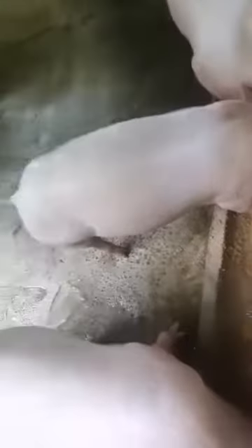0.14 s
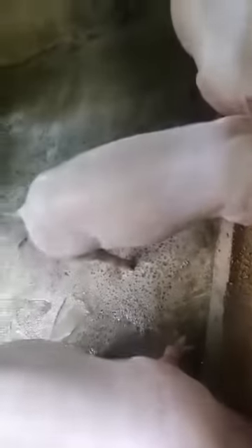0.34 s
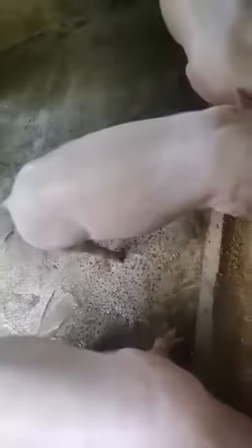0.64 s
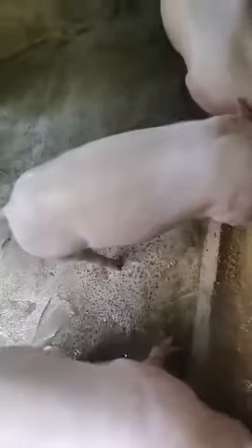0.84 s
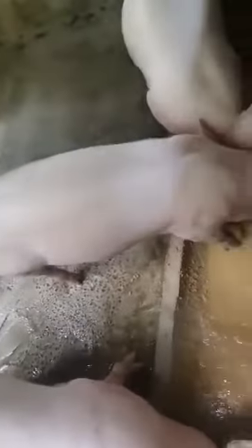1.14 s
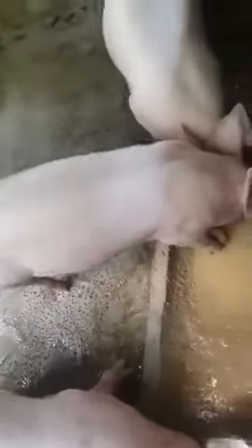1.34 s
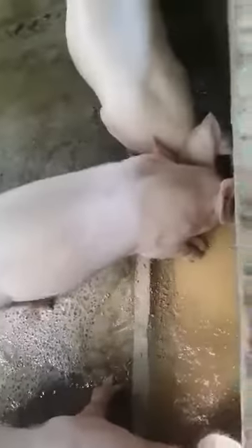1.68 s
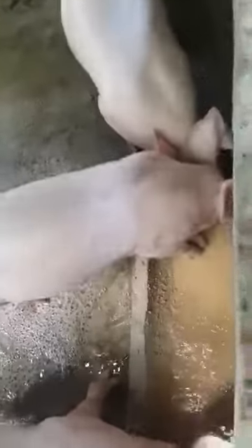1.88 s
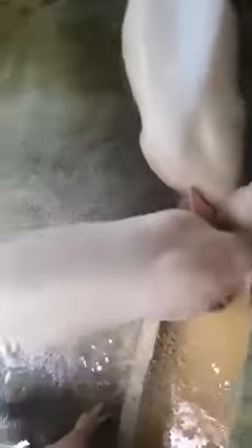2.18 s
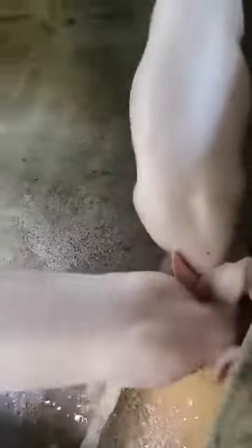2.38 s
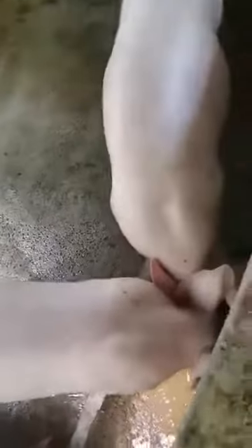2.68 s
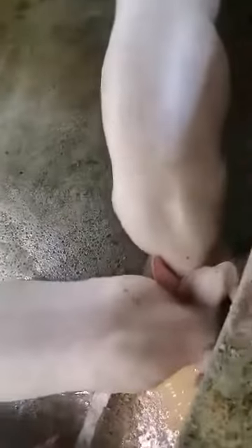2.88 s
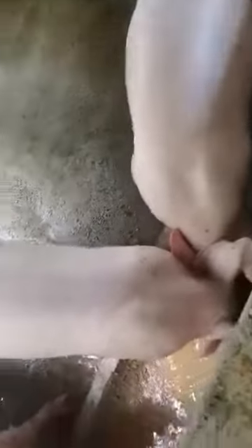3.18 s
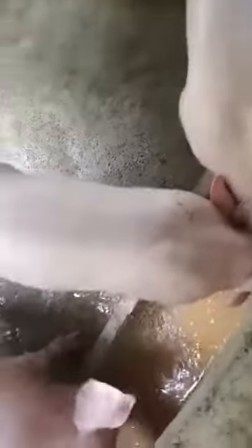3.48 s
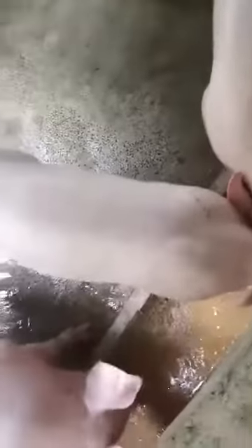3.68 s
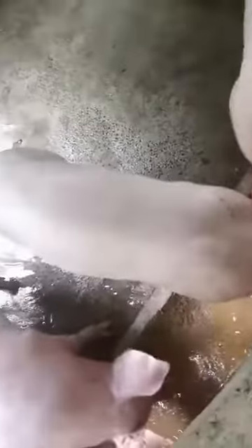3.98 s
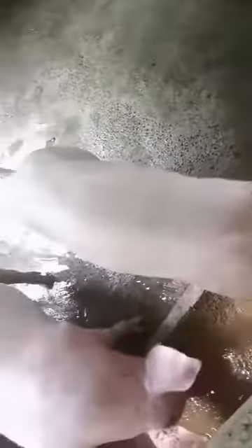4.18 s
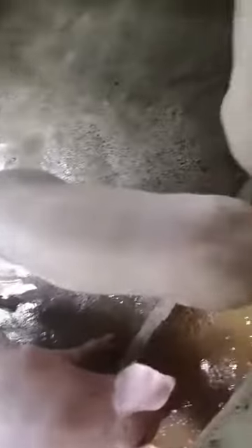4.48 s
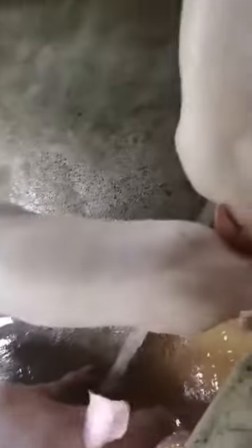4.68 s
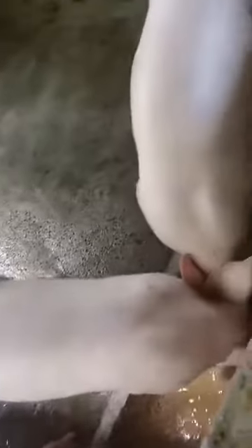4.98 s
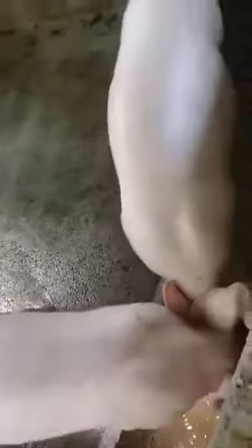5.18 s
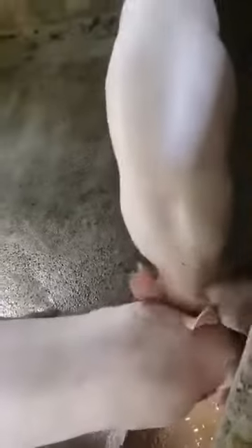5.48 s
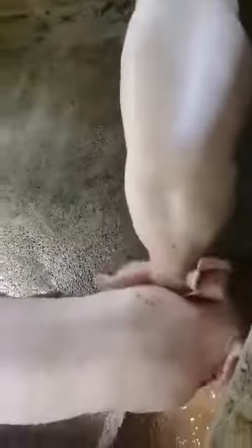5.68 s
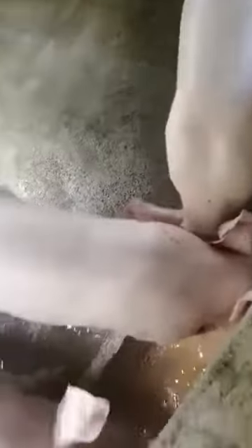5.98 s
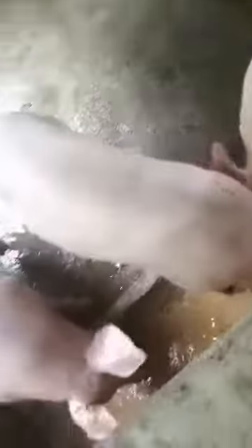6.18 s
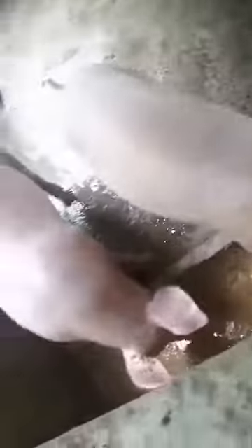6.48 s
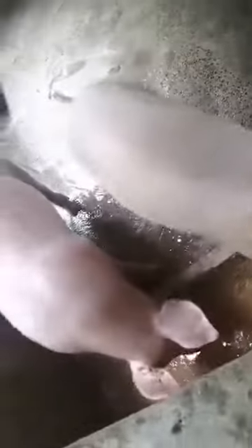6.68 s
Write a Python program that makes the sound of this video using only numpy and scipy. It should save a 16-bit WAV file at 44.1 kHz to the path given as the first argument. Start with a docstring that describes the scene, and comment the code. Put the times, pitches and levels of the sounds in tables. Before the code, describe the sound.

Young pigs eat wet feed from a concrete trough close to the microphone, with uneven jaw smacks, lip squelches, bubbling slurps and a few dull snout knocks. Small birds, probably chicks, give faint falling peeps throughout. Air briefly buffets the microphone about two and a half seconds in. The chewing then grows busier, joined by short low grunts, in a pen with a slight echo.

```python
"""First come a low grunt and the falling peeps of small birds, probably chicks, in a hard-walled pen.
Young pigs eat wet feed from a concrete trough: slop bubbles, snouts bump, jaws smack and lips squelch.
The eating sounds are tiny wet pops and ringing bubbles; a grunt is a train of pulses from the voice box.
About two seconds in, puffs of air buffet the left microphone. A faint farm background lies under it all."""
import sys
import numpy as np
from scipy import signal
from scipy.fft import rfft, irfft, next_fast_len
from scipy.io import wavfile
from scipy.ndimage import map_coordinates

SR = 44100
rng = np.random.default_rng(int(sys.argv[2]) if len(sys.argv) > 2 else 0)


def to_wav(sig):
    """Store sig (one row per channel, or 1-D mono) as 16-bit WAV at the path in sys.argv[1].

    Samples outside -1..1 are clipped; the rate is SR.
    """
    pcm = np.clip(np.atleast_2d(sig), -1, 1) * 32767
    pcm = np.round(pcm).astype(np.int16)
    wavfile.write(sys.argv[1], SR, pcm.T)  # frames by channels


N = 301644
TIME = np.arange(N) / SR

# A level_db compares rows of one table. A fade_s is the time a sound takes to drop by 60 dB.
# Bird whistles, which sag to a bend in pitch and then plunge:
# start_s, glide_s, bend_hz, sag_hz, plunge_hz, level_db, echo_db
BIRD_PEEPS = [(0.0, 0.039, 4223, 245, 560, -46, 1), (0.042, 0.1, 4160, 247, 487, -46, -11),
              (0.123, 0.13, 4056, 548, 1260, -38.5, 0.5), (0.257, 0.052, 4260, 203, 611, -46.5, 8),
              (0.4, 0.15, 4480, 360, 400, -49, -3), (0.574, 0.094, 4080, 458, 1325, -39, -4),
              (0.703, 0.091, 4500, 406, 1300, -46, 2), (0.951, 0.13, 3926, 682, 1004, -39, -5.5),
              (1.088, 0.14, 4694, 256, 700, -46.5, -2), (1.331, 0.09, 4143, 332, 1103, -44.5, 14),
              (1.538, 0.083, 4575, 394, 1504, -44.5, -7), (1.818, 0.089, 4156, 454.5, 153, -38.5, -2),
              (1.986, 0.14, 4540, 358, 926, -45.5, -2), (2.123, 0.091, 4600, 432, 1006, -41, 5.5),
              (2.478, 0.12, 4376, 650, 1353, -41, 9.5), (2.974, 0.12, 4510, 480, 1202, -40, 30),
              (3.356, 0.087, 4690, 424, 1250, -42.5, 13), (3.545, 0.07, 4390, 445, 1500, -46, 6),
              (3.744, 0.13, 4540, 900, 1136, -43, -6), (3.926, 0.094, 4590, 449, 1280, -45, 5),
              (4.144, 0.14, 4476, 303, 1446, -47, -3), (4.263, 0.14, 5010, 900, 1210, -42, -2),
              (4.533, .095, 4694, 306, 1753, -42.5, 1), (4.598, .085, 4110, 715, 600, -43.5, -1),
              (4.933, 0.068, 4434, 465, 1000, -41.5, 3.5), (5.021, 0.091, 4830, 600, 1020, -43.5, 4),
              (5.269, 0.084, 4510, 389, 1130, -46.5, -4), (5.429, 0.054, 4340, 393, 684, -45.5, -5),
              (5.628, 0.064, 4460, 436, 995, -52, -5), (5.764, 0.064, 4600, 388, 1310, -45, 15),
              (5.972, 0.077, 4760, 250, 970, -43, -11), (6.371, 0.17, 4325, 1087, 903, -40, -11),
              (6.526, 0.087, 4360, 391, 1082, -41.5, -2), (6.778, 0.086, 5400, 325, 1170, -44, -3)]
# Closed-mouth grunts: start_s, length_s, pulse_rate_hz, level_db, roughness (0 to 1), nose_hz
PIG_GRUNTS = [(0.0, 0.22, 117.3, -39.5, 0.86, 118), (3.563, 0.27, 118.8, -41, 0.85, 128),
              (4.278, 0.15, 133.1, -33.5, 0.57, 125), (4.398, 0.14, 137.5, -40.5, 0.43, 140),
              (4.618, 0.25, 125.4, -49, 0.8, 196), (5.159, 0.09, 132.8, -42, 0.77, 256),
              (5.473, 0.1, 129.7, -44, 0.65, 246), (5.889, 0.1, 132.7, -38.5, 0.7, 260),
              (6.19, 0.12, 126, -38.5, 0.7, 252), (6.386, 0.11, 135.7, -41.5, 0.6, 266)]
# How the snout muffles the voice: pitch_hz, level_db
SNOUT_TONE = [(30, 0.5), (65, 0), (128, -1.5), (190, -3), (270, -1.5), (350, 1), (480, -13.5), (800, -16.5),
              (2000, -79)]
# Tone of the farm background: pitch_hz, level_db
YARD_TONE = [(20, -18), (58, 19), (150, -4.5), (400, -9.5), (1000, -42), (2300, -23), (4500, -68),
             (7000, -59), (13000, -29)]
# Sucks at the slop: start_s, length_s, level_db, extra_gulp_db, extra_froth_db
SUCKS = [(0.164, 0.26, -38.5, 5, 2.5), (0.44, 0.26, -43, 5.5, -7), (0.775, 0.082, -57, 24, -12),
         (1.168, 0.2, -42.5, -1.5, -3), (1.58, 0.12, -48.5, -20, 7.5), (1.835, 0.05, -48.5, 14, 6.5),
         (1.98, 0.017, -30.5, -7, -3), (2.117, 0.19, -41.5, 0, 1.5), (2.353, 0.063, -37, 3.5, -6),
         (2.469, 0.098, -41.5, 11, 10), (2.619, 0.058, -39.5, 3, 6.5), (2.765, 0.22, -41, 5, 4),
         (3.035, 0.12, -53.5, -15, 0.5), (3.202, 0.12, -44.5, -2, 3), (3.345, 0.011, -25.5, 0.5, -2),
         (3.462, 0.027, -37.5, -6, 4), (3.536, 0.13, -40.5, 7.5, 8), (3.766, 0.17, -33.5, 1, 2),
         (4, 0.018, -31, -0.5, -18), (4.114, 0.087, -38.5, -25, 8), (4.343, 0.17, -37.5, 3.5, 0.5),
         (4.705, 0.055, -35, -4.5, 3.5), (4.995, 0.26, -38, -1, 0.5), (5.116, 0.091, -32.5, 2.5, 0),
         (5.364, 0.14, -39, -11, 4.5), (5.53, 0.18, -41.5, -6, -6), (5.855, 0.12, -32, 0.5, -0.5),
         (6.025, 0.15, -40, 3.5, 4), (6.177, 0.16, -35.5, 0.5, 0.5), (6.45, 0.023, -37, 3, 2),
         (6.478, 0.051, -37.5, -0.5, -29.5), (6.613, 0.038, -50.5, -21, 9), (6.714, 0.034, -39.5, -25, -1)]
# Tones of the slop's low gulp, middle slurp and high froth: pitch_hz, level_db
GULP_TONE = [(90, 3.5), (180, -4.5), (260, 2), (340, -4), (480, 4.5), (650, 5), (1000, 2.5), (2000, -57)]
SLURP_TONE = [(300, -36), (600, -12), (1000, 0), (1300, -1.5), (1700, 2), (2400, 3.5), (3000, 1.5),
              (4300, -23), (6000, -60), (10000, -68)]
FROTH_TONE = [(2000, -39), (4000, 4), (5200, 0.5), (6500, 3.5), (7800, -2), (9400, -1.5), (10300, -12),
              (13000, -4.5)]
# Snouts hitting the trough: start_s, level_db
SNOUT_BUMPS = [(0.408, -23.5), (0.504, -22), (2.011, -20.5), (2.243, -18), (2.94, -10.5), (3.835, -31),
               (5.917, -15.5), (6.063, -22.5)]
# Jaw smacks: start_s, level_db, mouth_hz, second_hz, hollow_db (more = less splatter), left_db, fade_s
JAW_SMACKS = [(0.95, -31.5, 2100, 1380, 1.7, -4, 0.056), (1.168, -29.5, 1530, 2310, 1.9, -2, 0.02),
              (1.296, -22, 2230, 2390, 11, -10, 0.009), (1.311, -17.5, 1840, 1280, 5, -5, 0.032),
              (1.418, -18, 2100, 1050, 5.3, -3.5, 0.024), (1.605, -26.5, 1580, 2410, 2.3, -3, 0.0092),
              (1.685, -24, 2380, 1280, 4.5, -4, 0.02), (1.883, -29, 1220, 2290, 1.9, -10, 0.012),
              (2.219, -22.5, 2380, 1230, 1, -3, 0.068), (2.271, -18, 1680, 1015, 3.7, 0.5, .035),
              (2.476, -19, 1020, 1730, 3, 1, 0.073), (2.523, -18, 644, 1140, 3.4, 3.5, 0.088),
              (2.643, -13.5, 1035, 1970, 3.5, 0, 0.12), (2.94, -15.5, 753, 1120, 3.7, 1.5, 0.034),
              (3.198, -23.5, 1096, 1930, 15, -2, 0.028), (3.274, -23.5, 477, 870, 12, 2, 0.04),
              (3.312, -19, 1705, 1146, 4, -3, 0.033), (3.341, -22.5, 1710, 2370, 18, 0, 0.045),
              (3.362, -31, 2320, 1730, 5, 14, 0.072), (3.472, -21, 1870, 1450, 18, -2, 0.031),
              (3.539, -28, 464, 1000, 6.5, 3, 0.024), (3.574, -15, 800, 1180, 3.4, 3, 0.17),
              (3.758, -15, 1716, 2390, 5.5, 0, 0.18), (3.832, -19, 1470, 2450, 2.9, -3, 0.094),
              (3.917, -18, 994, 1730, 3.1, 0, 0.049), (4.034, -19, 914, 2470, 1.9, -4.5, 0.046),
              (4.116, -20, 1605, 1920, 14, 2, 0.089), (4.24, -20, 1810, 2360, 7.5, -2.5, .056),
              (4.398, -20, 1550, 1080, 1.7, 8, 0.11), (4.969, -20.5, 1205, 1570, 6, -4.5, 0.24),
              (5.148, -15, 2230, 1090, 2.5, -2, 0.13), (5.186, -14.5, 966, 1755, 6.1, -2.5, 0.025),
              (5.195, -18.5, 1010, 1900, 5.1, -7, 0.049), (5.285, -15.5, 1010, 2060, 10, 1.5, 0.16),
              (5.389, -10.5, 1970, 1060, 16, 2, 0.035), (5.396, -16, 1780, 2220, 11.5, -15, 0.04),
              (5.416, -19, 1860, 1770, 18, -1, 0.045), (5.553, -17, 960, 2000, 3.3, -5, 0.074),
              (5.732, -17.5, 2250, 2580, 15, -7, 0.059), (5.918, -18.5, 1174, 890, 7.6, -6, 0.034),
              (5.971, -20, 1090, 1630, 1.8, -9.5, 0.063), (6.063, -30.5, 715, 1550, 2.3, -3, 0.014),
              (6.329, -29, 2640, 1500, 5.6, -5, 0.036), (6.433, -18.5, 1940, 2080, 6.3, -5, 0.15),
              (6.457, -18.5, 2456, 1560, 11, -1, 0.047)]
# Wet lips parting: start_s, level_db, pitch_hz, fade_s, mist_db (more = louder droplets)
LIP_SQUELCHES = [(1.3286, -23, 4550, 0.065, -13), (1.5397, -15, 4380, 0.12, -18),
                 (1.6067, -25, 4940, 0.035, -26), (1.616, -18, 4400, 0.14, -13),
                 (1.727, -15.5, 7350, 0.043, -35), (1.9462, -17, 4100, 0.041, -39),
                 (1.98, -13.5, 4500, 0.0095, -40), (1.989, -21, 4600, 0.082, -28),
                 (2.276, -18, 4130, 0.11, -30), (2.474, -31, 4300, 0.087, -6), (3.251, -19, 6460, 0.11, -6),
                 (3.358, -17, 6050, 0.11, -21), (3.483, -12.5, 4400, 0.22, -34),
                 (3.578, -20.5, 4900, 0.16, -5), (3.793, -20, 6940, 0.16, 1.5),
                 (3.927, -19.5, 3950, 0.19, -9), (4.035, -18.5, 3950, 0.045, -32),
                 (4.038, -16.5, 6600, 0.12, -34), (4.0978, -15.5, 4840, 0.12, -21),
                 (4.404, -20, 4300, 0.38, -14), (4.492, -13.5, 4400, 0.093, -16),
                 (4.781, -21.5, 3950, 0.12, -9), (5.137, -17, 4150, 0.16, -6.5),
                 (5.2293, -14, 3780, 0.12, -9.5), (5.283, -17.5, 4700, 0.17, -8),
                 (5.389, -21.5, 6130, 0.18, 1), (5.554, -13.5, 5960, 0.13, -30),
                 (5.619, -16.5, 4320, 0.26, -27), (5.724, -17.5, 4340, 0.22, -20),
                 (6.4356, -20, 6000, 0.15, -29), (6.449, -17, 4850, 0.11, -12)]
# Strength of the draught on the microphone: time_s, level_db
DRAUGHT_LEVEL = [(1.9, -51), (2.08, -38.5), (2.18, -27), (2.32, -42), (2.42, -27), (2.5, -34), (2.58, -16),
                 (2.66, -15.5), (2.72, -35), (2.82, -26), (2.95, -45)]
# Tone of the draught's rumble: pitch_hz, level_db
DRAUGHT_TONE = [(12, -30), (20, 21), (102, 13), (184, -6), (258, -10.5), (400, -16), (520, -73),
                (880, -120)]
# Single puffs of air: time_s, peak_db, width_s
AIR_PUFFS = [(2.449, -6.5, 0.0027), (2.548, -14, 0.0019), (2.555, -11.5, 0.0013), (2.616, -2.5, 0.0021),
             (2.772, -9, 0.003)]
# How long the pen echoes: pitch_hz, fade_s
PEN_ECHO = [(150, 0.28), (1000, 0.19), (4000, 0.38), (10000, 0.038)]
# Tone of each microphone's opening: pitch_hz, level_db
LEFT_MIC_TONE = [(100, -2), (4000, 6.5), (9000, 2), (12000, -5.5)]
RIGHT_MIC_TONE = [(300, -1), (4000, 8.5), (8000, -6), (9600, 4), (10600, -19)]


def amp(db):
    """Turn decibels into a number to multiply by."""
    return 10 ** (np.asarray(db) / 20)


def unit(x):
    """Scale a sound to an average power of 1."""
    return x / np.sqrt(np.mean(x ** 2) + 1e-20)


def burst(x):
    """Scale a short sound to the energy of 3 ms at full level."""
    return x / np.sqrt(np.sum(x ** 2) / (.003 * SR) + 1e-20)


def along(table, hz):
    """Read between the rows of a (pitch_hz, value) table."""
    pitches, values = np.transpose(table)
    return np.interp(np.log(hz + 1), np.log(pitches + 1), values)


def wobble(rate_hz, size):
    """A smooth curve through rate_hz random values a second."""
    return map_coordinates(rng.standard_normal(1024), [np.arange(size) * rate_hz / SR], mode="wrap")


def filtered(x, gain_at):
    """Turn each pitch up or down by gain_at(hz)."""
    size = x.shape[-1]
    padded = next_fast_len(size + 8192)
    return irfft(rfft(x, padded) * gain_at(np.fft.rfftfreq(padded, 1 / SR)), padded)[..., :size]


def coloured(x, tone):
    """Shape a sound with a tone table, then scale it to a power of 1."""
    return unit(filtered(x, lambda hz: amp(along(tone, hz))))


def band(x, low_hz, high_hz):
    """Keep what lies between two pitches."""
    return signal.sosfilt(signal.butter(4, [low_hz, high_hz], "band", fs=SR, output="sos"), x)


def resonate(x, hz, q):
    """Ring at one pitch; a higher q rings longer."""
    return signal.lfilter(*signal.iirpeak(hz, q, SR), x)


def add(track, start_s, sound):
    """Mix a sound into a track."""
    start = round(start_s * SR)
    track[..., start:start + sound.shape[-1]] += sound[..., :N - start]


def in_pen(x, echo_db, near_db, left_db=0, mic_gap_m=0.13):
    """Sound arrives directly, then scatters off the nearby trough and floor, then echoes off the walls."""
    hz, t, noise = signal.stft(rng.standard_normal((2, SR // 5)), SR, nperseg=256)
    alike = np.sinc(2 * hz * mic_gap_m / 343)[:, None]  # long waves reach both microphones alike
    mid, side = noise[0] * np.sqrt(1 + alike), noise[1] * np.sqrt(1 - alike)
    fade = amp(-60 * t / along(PEN_ECHO, hz)[:, None])
    echo = signal.istft(np.array([mid + side, mid - side]) * fade, SR, nperseg=256)[1]
    t = np.arange(echo.shape[1]) / SR
    near = echo * amp(-60 * t / .022)
    walls = echo * (1 - np.exp(-t / 0.0046))
    paths = amp(echo_db) * walls / np.linalg.norm(walls[0])
    paths += amp(near_db) * near / np.linalg.norm(near[0])
    paths[[0, 1], [rng.integers(4, 17), 0]] += 1  # the direct sound reaches the right side first
    paths *= amp([[left_db / 2], [-left_db / 2]]) / np.linalg.norm(paths[0])
    return signal.fftconvolve(x[None], paths, axes=1)[:, :N]


def grunts(alternation=0.45):
    """The voice box pulses, strong and weak by turns; the snout muffles it and hums along."""
    out, t = np.zeros((2, N)), np.arange(SR // 3) / SR
    for start_s, length_s, rate_hz, level_db, roughness, nose_hz in PIG_GRUNTS:
        waver = 1 + .012 * wobble(14, len(t)) + .06 * roughness * wobble(130, len(t))
        cycle = np.floor(np.cumsum(rate_hz * waver) / SR)
        strength = (1 + alternation * (-1) ** cycle) * amp(2 * wobble(93.3, len(t)))
        pulses = unit(np.diff(cycle, prepend=0) * strength)
        buzz = pulses + .5 * roughness * rng.standard_normal(len(t))
        voice = amp(-2) * unit(resonate(buzz, nose_hz, q=10)) + coloured(buzz, SNOUT_TONE)
        swell = np.abs(np.sin(np.pi * np.clip(t / length_s, 0, 1))) ** 0.17
        add(out, start_s, in_pen(amp(level_db) * swell * voice, echo_db=-11, near_db=-10))
    return out


def peeps(plunge_s=.06, release_s=0.0033):
    """Each bird's whistle sags slowly, then plunges; nearer birds come with less echo."""
    out, t = np.zeros((2, N)), np.arange(SR // 3) / SR
    for start_s, glide_s, bend_hz, sag_hz, plunge_hz, level_db, echo_db in BIRD_PEEPS:
        glide, drop = np.clip(t / glide_s, 0, 1), np.clip((t - glide_s) / plunge_s, 0, 1)
        hz = bend_hz + sag_hz * (1 - glide ** 1.7) - plunge_hz * drop ** .8
        high = np.interp(bend_hz, [4100, 4600], [0, 1])
        crack = high * np.sin(np.pi * np.sqrt(drop))  # only high whistles crack as they plunge
        rasp = .012 + .016 * high + .03 * crack
        hz *= 1 + .011 * wobble(120, len(t)) + rasp * wobble(1100, len(t))
        flutter = amp(3.5 * wobble(160, len(t)))
        swell = glide ** 0.5 * np.clip((glide_s + plunge_s - t) / release_s, 0, 1)
        whistle = amp(level_db + 2) * swell * flutter * np.sin(2 * np.pi * np.cumsum(hz) / SR)
        add(out, start_s, in_pen(whistle, echo_db, near_db=-1, left_db=.5))
    return out


def yard():
    """The steady, faint background of the farm, nearly the same in both ears."""
    return amp(-49) * coloured(rng.standard_normal(N) + 0.14 * rng.standard_normal((2, N)), YARD_TONE)


def sucking(gulp=False, froth=False, churn_db=-50.5, attack_s=0.027):
    """The slop's level in dB: each suck starts quickly, sags while it is held and dies away."""
    power = np.full(N, amp(churn_db) ** 2)  # the slop is never quite still
    t = np.arange(SR // 2) / SR
    for start_s, length_s, level_db, extra_gulp_db, extra_froth_db in SUCKS:
        fall_db = 7.5 * t + 235 * np.maximum(t - length_s, 0)
        suck_db = level_db + gulp * extra_gulp_db + froth * extra_froth_db - fall_db
        add(power, start_s, (np.minimum(t / attack_s, 1) * amp(suck_db)) ** 2)
    return 10 * np.log10(power)


def bubbles(count, centre_hz, cycles, spread_db):
    """Small air pockets ring for a few cycles, rising in pitch as they close."""
    start = rng.integers(0, N, (count, 1))
    hz = centre_hz * np.exp(.5 * rng.standard_normal((count, 1)))
    strength = amp(spread_db * np.minimum(rng.exponential(size=(count, 1)), 3))
    samples = np.arange(SR // 50)
    age = hz * samples / SR / cycles
    rise = 1 + 0.085 * np.minimum(age, 2)
    ring = strength * np.exp(-3 * age) * np.sin(2 * np.pi * cycles * age * rise)
    return unit(np.bincount((start + samples).ravel(), ring.ravel())[:N])


def crackle(size, per_s, spread_db):
    """Tiny films of liquid burst at random: many small, a few large."""
    chance, strength, sign = rng.random(size), rng.exponential(size=size), rng.standard_normal(size)
    return unit((chance < per_s / SR) * np.sign(sign) * amp(spread_db * np.minimum(strength, 4)))


def hollowed(x, depth_db, width_hz, hold_s):
    """Mouths and pockets in the slop keep changing shape, lifting a few pitches at a time."""
    spectrum = signal.stft(x, nperseg=1024)[2]
    rows, cols = np.indices(spectrum.shape)
    places = [rows * SR / 1024 / width_hz, cols * 512 / SR / hold_s]
    lift = map_coordinates(rng.standard_normal((256, 256)), places, order=1, mode="wrap")
    return unit(signal.istft(spectrum * amp(depth_db * lift), nperseg=1024)[1][:N])


def moving_in_pen(x, echo_db, near_db, left_db):
    """A long sound gets new echoes three times a second, as the heads move."""
    out, step = np.zeros((2, N)), SR // 3
    for start in range(0, N, step):
        add(out, start / SR, in_pen(x[start:start + step], echo_db, near_db, left_db))
    return out


def feeding():
    """Snouts churn the slop: low gulps, bubbling slurps and a fine froth, in quick uneven sucks."""
    gulp_db, slurp_db, froth_db = sucking(gulp=True) - 7, sucking() - 2.5, sucking(froth=True) - 9
    uneven = amp(2 * wobble(35, N))
    gulp = bubbles(count=1400, centre_hz=384.3, cycles=10.6, spread_db=0)
    slurp = bubbles(count=2100, centre_hz=1400, cycles=13.6, spread_db=3.5)
    slurp += amp(-6.5) * crackle(N, per_s=2000, spread_db=4.5)
    froth = bubbles(count=3000, centre_hz=6530, cycles=17, spread_db=2.5)
    froth += amp(10.5) * crackle(N, per_s=1500, spread_db=0.5)
    gulp = amp(gulp_db) * hollowed(coloured(gulp, GULP_TONE), 6.5, width_hz=94.3, hold_s=0.049)
    slurp = amp(slurp_db) * hollowed(coloured(slurp, SLURP_TONE), 2.5, width_hz=283, hold_s=0.06)
    froth = amp(froth_db) * hollowed(coloured(froth, FROTH_TONE), 6, width_hz=466.6, hold_s=0.06)
    fizz = unit(band(crackle(N, per_s=9800, spread_db=9), 11200, 14200))
    fizz *= amp(2.6 * wobble(13, N))  # in clusters
    fizz *= amp(-58.5 + 1.1 * (froth_db + 48.5))  # hard churning bursts the finest bubbles
    return (moving_in_pen(uneven * gulp, echo_db=-1.5, near_db=-22, left_db=1.5)
            + moving_in_pen(uneven * slurp, echo_db=-1.5, near_db=2, left_db=-2.5)
            + moving_in_pen(uneven * (froth + fizz), echo_db=-2, near_db=5, left_db=3))


def bumps(fade_s=0.044):
    """A snout pushes through the slop and hits the trough with a dull, wet knock."""
    out, t = np.zeros((2, N)), np.arange(SR // 5) / SR
    for start_s, level_db in SNOUT_BUMPS:
        pops = crackle(len(t), per_s=1700, spread_db=5.5) * amp(-60 * t / fade_s)
        pops[0] += 15  # first contact
        knock = amp(level_db - 10) * burst(band(pops, 191, 730))
        add(out, start_s, in_pen(knock, echo_db=-6.5, near_db=-8.5, left_db=1.5))
    return out


def mouth_ring(pops, hz, rise=0.088, opening_s=0.015, width_hz=85):
    """Pops make the mouth ring, and its pitch rises as the jaw opens."""
    t = np.arange(len(pops)) / SR
    rising_hz = hz * (1 + rise * (.5 - np.exp(-t / opening_s)))
    turn = np.exp(2j * np.pi * np.cumsum(rising_hz) / SR)  # lets the filter follow the pitch
    ring = np.real(turn * signal.lfilter([1], [1, -np.exp(-np.pi * width_hz / SR)], pops / turn))
    return burst(band(ring, hz / 2, hz * 1.275))


def smacks():
    """A jaw opens with wet pops that ring the mouth, knock in the throat and throw a spray."""
    out, t = np.zeros((2, N)), np.arange(SR // 5) / SR
    for start_s, level_db, mouth_hz, second_hz, hollow_db, left_db, fade_s in JAW_SMACKS:
        fade = amp(-60 * t / max(fade_s, .01))
        pops = crackle(len(t), per_s=1100, spread_db=2) * fade
        pops[0] += 9  # the seal of the lips breaks
        mouth = mouth_ring(pops, mouth_hz) + amp(-6) * mouth_ring(pops, second_hz)
        splatter = amp(-hollow_db) * burst(band(pops, 782, 2660))
        knock = amp(-20) * burst(band(pops, 206, 690))
        drops = crackle(len(t), per_s=920, spread_db=3) * fade ** 0.24
        spray = amp(-17.5) * burst(band(drops, 3100, 8200))
        smack = amp(level_db - 7) * (mouth + splatter + knock + spray)
        add(out, start_s, in_pen(smack, echo_db=-7, near_db=-3, left_db=left_db))
    return out


def squelches():
    """Lips peel from the feed with a bright snap that rings the gap between them and throws a mist."""
    out, t = np.zeros((2, N)), np.arange(SR // 8) / SR
    for start_s, level_db, pitch_hz, fade_s, mist_db in LIP_SQUELCHES:
        pops = crackle(len(t), per_s=1900, spread_db=2) * amp(-60 * t / max(fade_s, .01))
        pops[0] += 13  # the wet film snaps first
        ring = resonate(pops, pitch_hz, q=6.1) + amp(-9) * resonate(pops, pitch_hz * 1.437, q=5.1)
        snap = burst(band(ring, 2300, 8800))
        mist = amp(mist_db) * burst(band(pops, 8540, 14800))
        add(out, start_s, amp(level_db - 12) * in_pen(snap, echo_db=-9, near_db=-4, left_db=-1))
        add(out, start_s, amp(level_db - 12) * in_pen(mist, echo_db=-8, near_db=-2, left_db=10))
    return out


def air():
    """Swirls of air push on the left microphone in single thumps over a low rumble."""
    draught_db = np.interp(TIME, *np.transpose(DRAUGHT_LEVEL))
    push = amp(draught_db) * coloured(rng.standard_normal((2, N)), DRAUGHT_TONE)
    for time_s, peak_db, width_s in AIR_PUFFS:
        offset = (TIME - time_s) / width_s
        push += amp(peak_db) * (1 - offset ** 2) * np.exp(-offset ** 2 / 2)
    return push * amp([[0], [-20]])  # much weaker on the right


def scene():
    """Pigs, birds, moving air and the farm background together."""
    return smacks() + bumps() + squelches() + feeding() + peeps() + grunts() + air() + yard()


def record(dry, top_hz=13500):
    """The left microphone catches more of the highest treble; nothing is kept above top_hz."""
    return filtered(dry, lambda hz: amp([along(LEFT_MIC_TONE, hz), along(RIGHT_MIC_TONE, hz)])
                    * (hz < top_hz))


dry = scene()
out = record(dry)
to_wav(out)
```